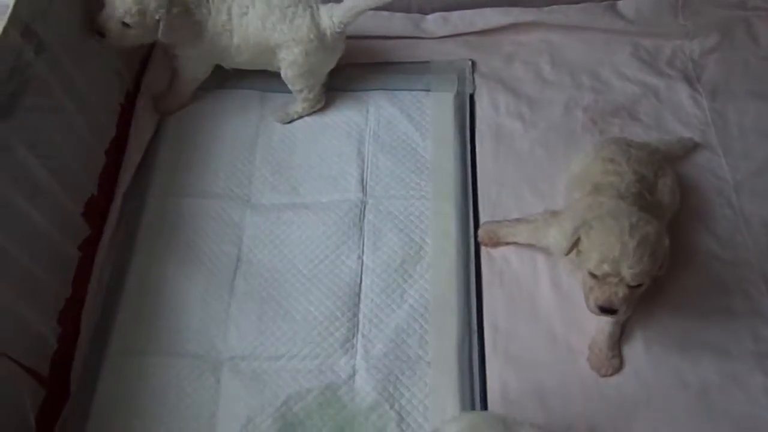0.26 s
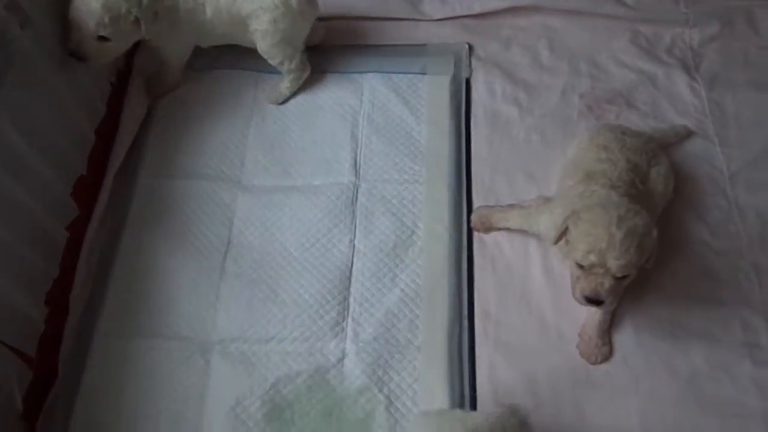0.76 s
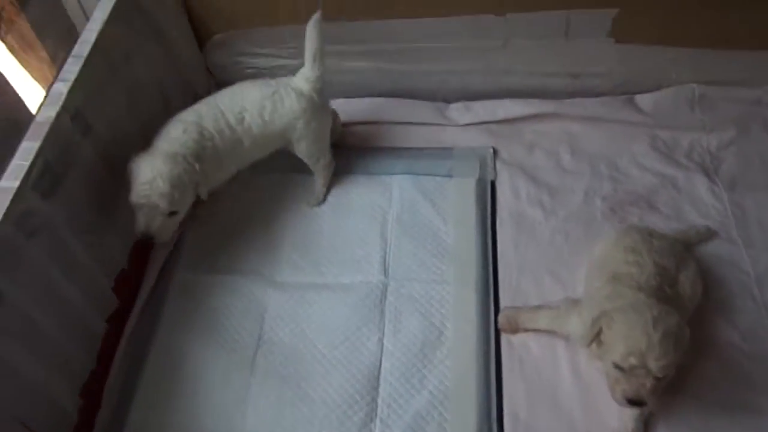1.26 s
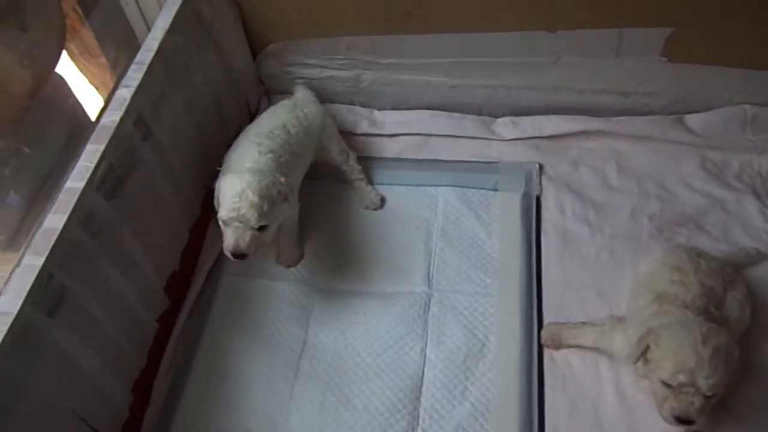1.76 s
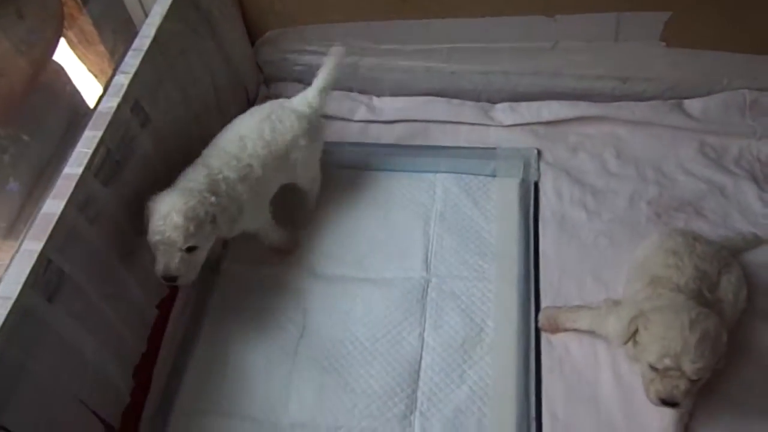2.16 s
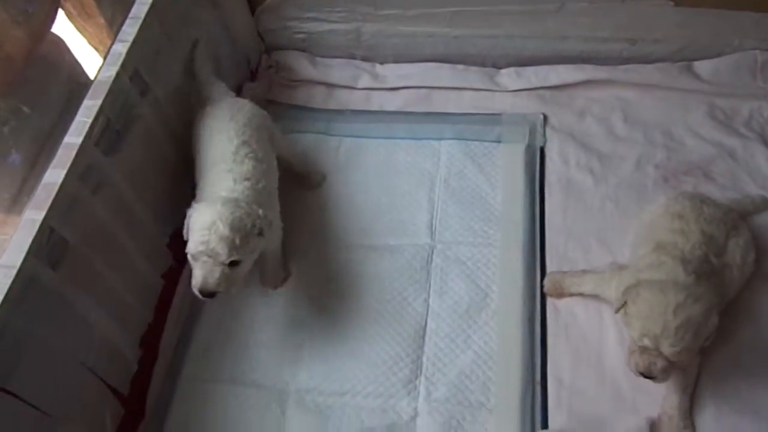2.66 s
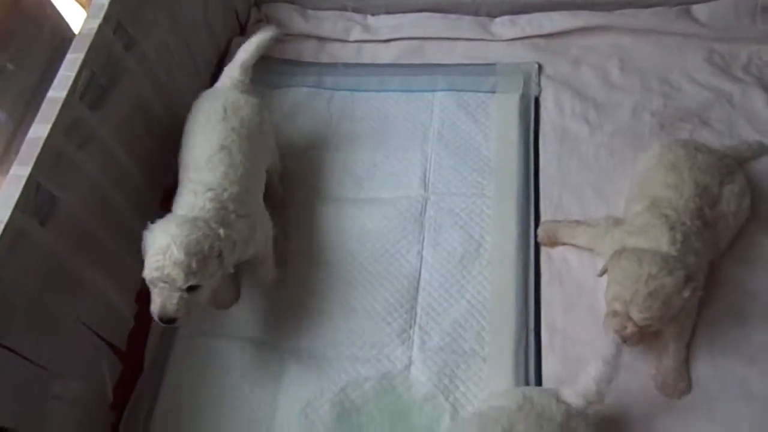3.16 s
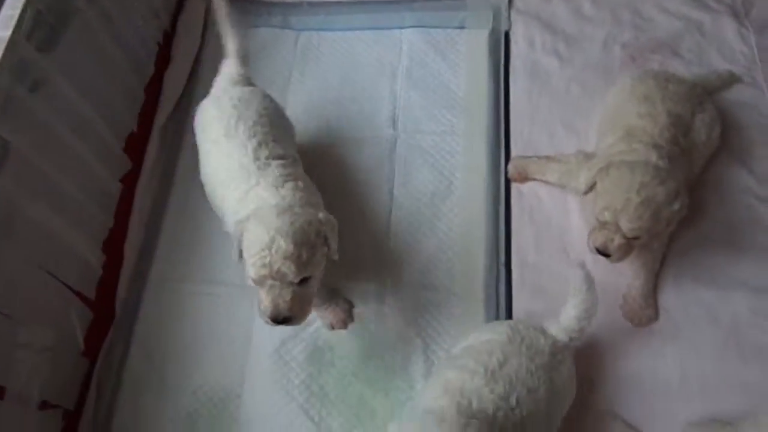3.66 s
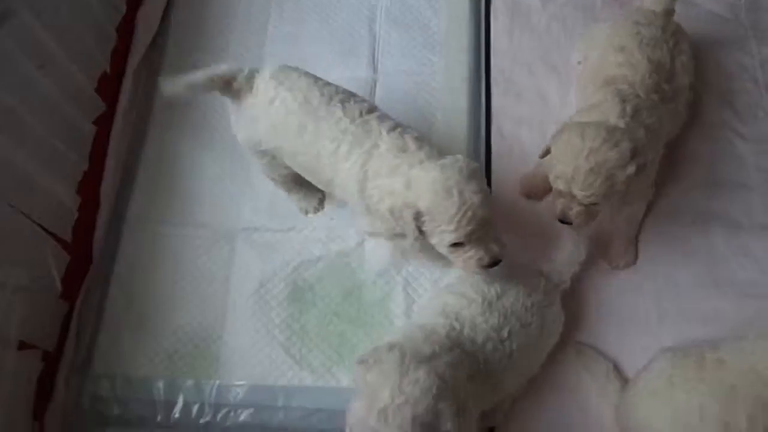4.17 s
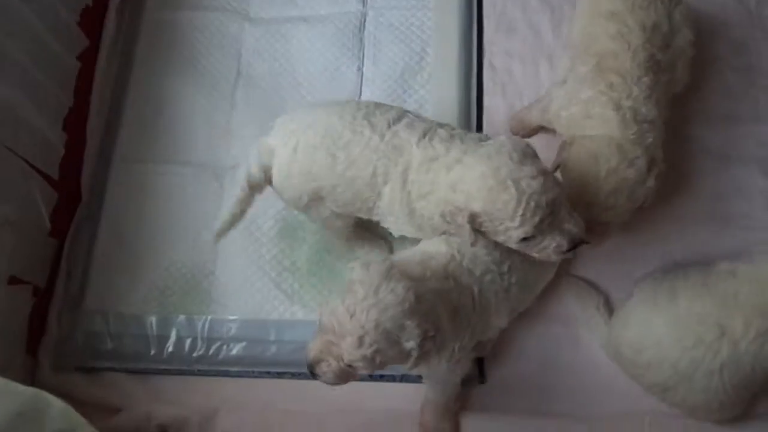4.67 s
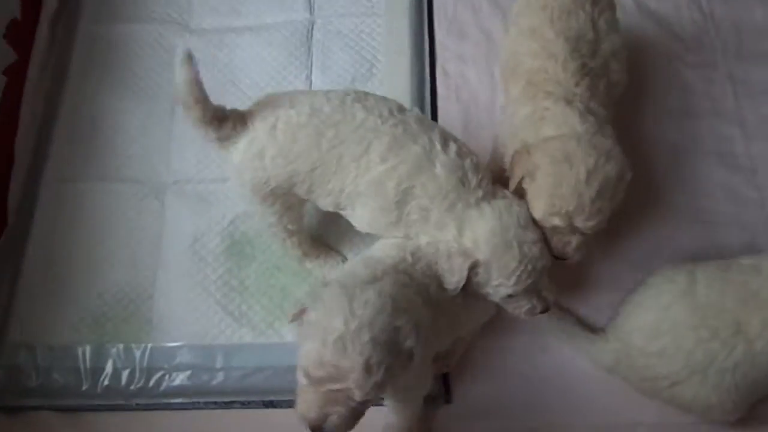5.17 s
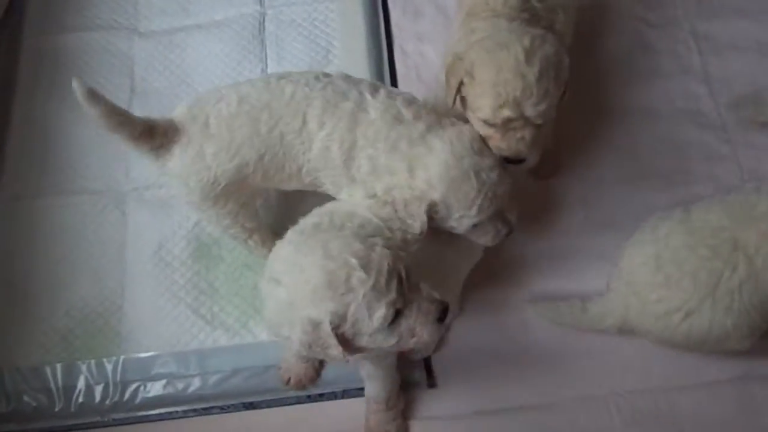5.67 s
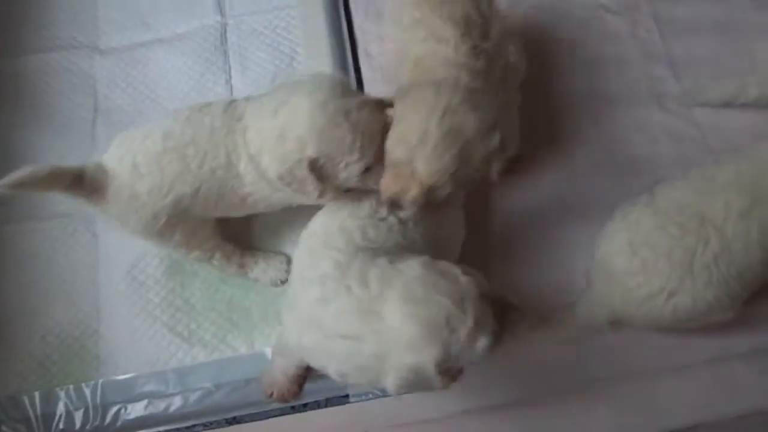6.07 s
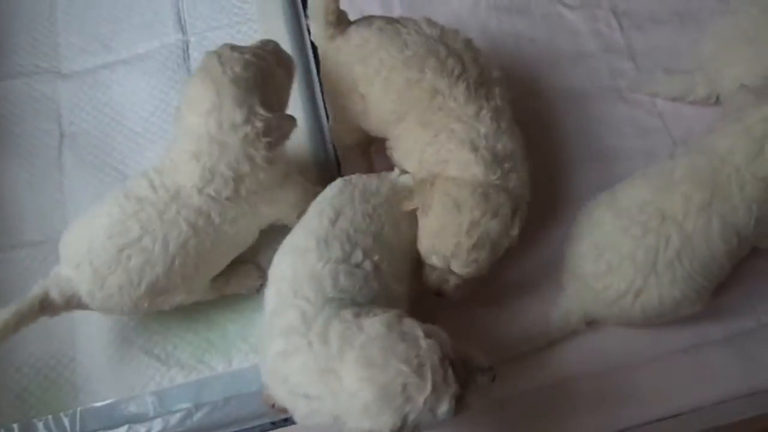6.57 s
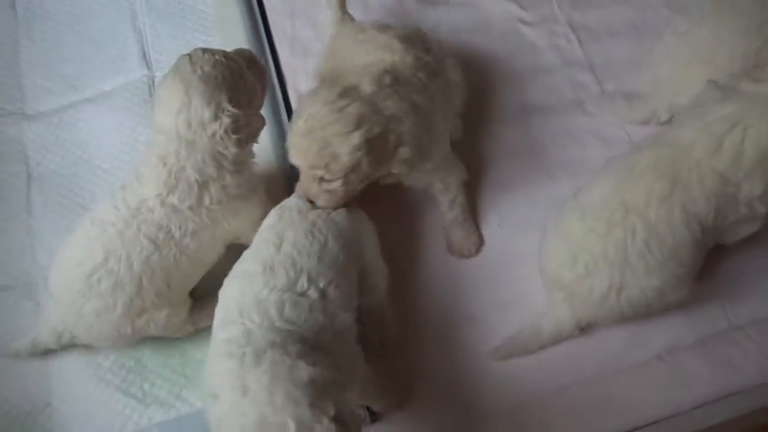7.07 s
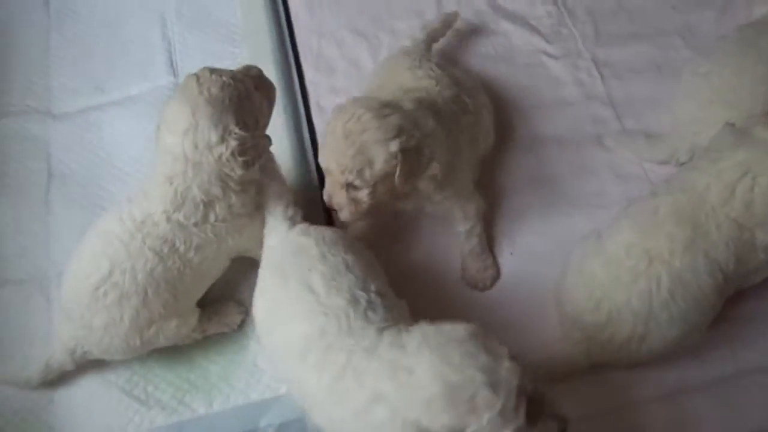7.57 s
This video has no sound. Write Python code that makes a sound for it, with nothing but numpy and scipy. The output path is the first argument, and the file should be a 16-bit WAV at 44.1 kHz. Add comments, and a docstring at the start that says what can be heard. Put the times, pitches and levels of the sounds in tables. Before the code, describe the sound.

Young puppies move about a padded box in a small room, heard close and almost centred. Faint low grunts come at 0 and 0.25 s, then at 0.85 s a very loud, harsh yelp arches up and breaks into rasp, ringing briefly. Rough little grunts with paw scuffs and claw ticks follow from 1.1 to 1.9 s, then near quiet, with a faint grunt at 2.8. A small yip at 3.05 s precedes two loud, raspy yelps at 3.3 and 3.5, a low falling whine at 3.75 and a longer one rising and sinking at 4.1. Soft grunts run from 4.6 to 5.8, with a quiet whine at 5.4. A thin wavering squeak comes at 6.1, then light ticks and a soft scuff. A faint yip at 7.3, a grunt at 7.4 and a loud, clear yip at 7.6 finish over steady faint rustle and room tone.

```python
"""Young puppies play in a whelping box in a small room, close to the microphone. Closed-mouth grunts come
first and recur throughout; a harsh yelp follows at 0.8 s, then a yip, two more yelps and falling whines
from 3 to 4.5 s, a last whine, a wavering squeak at 6.1 s and two yips near the end. Each cry is a sum of
harmonics mixed with rasping noise. Bursts of noise make paws tick and scuff over a steady rustle of
bedding and room tone; the room rings after each sound and a limiter holds down the loudest cries."""
import sys
import numpy as np
from scipy import signal
from scipy.fft import rfft, irfft, next_fast_len
from scipy.io import wavfile
from scipy.ndimage import uniform_filter1d, minimum_filter1d, map_coordinates

SR = 44100
rng = np.random.default_rng(int(sys.argv[2]) if len(sys.argv) > 2 else 0)


def to_wav(sig):
    """Store sig (one row per channel, or 1-D mono) as 16-bit WAV at the path in sys.argv[1].

    Samples outside -1..1 are clipped; the rate is SR.
    """
    pcm = np.clip(np.atleast_2d(sig), -1, 1) * 32767
    pcm = np.round(pcm).astype(np.int16)
    wavfile.write(sys.argv[1], SR, pcm.T)  # frames by channels


N = 344421
TOP_HZ = 15150  # upper band limit of the voices and the microphone
CRY_SAMPLES = SR // 2  # longest cry

# Levels and roughness of all cries are those before the voice dips; throat and rasp colours are relative.
# Harsh yelps, one pitch arch each: (time [s], rise [s], fall [s], tail [s], start [Hz], top [Hz], end [Hz],
# arch roundness [exponent], top level [dB], loss under the top [dB/octave], roughness [0-1])
YELPS = [(.848, 0.038, 0.058, 0.0078, 1010, 1770, 960, 2.8, -1, 18, .1),
         (3.285, 0.043, 0.055, 0.0045, 1088, 1627, 1036, 4, 1, 46.5, 0.2),
         (3.529, .049, .126, .055, 1108, 1657, 938, 1.8, -1.5, 27, 0.05)]
# Throat and mouth colour, a list for each yelp: (frequency [Hz], gain [dB])
YELP_THROATS = [
    [(500, -38.5), (900, -12), (1700, 3.5), (2400, -14), (2900, -8), (3550, -8.5), (4050, -8.5),
     (4650, -16.5), (5400, -23.5), (6400, 0), (7300, -38.5), (8700, -24), (10500, -32), (15000, -53)],
    [(500, -35), (1000, -21), (1600, 0), (2300, -17), (2950, -3), (3200, -22.5), (3500, -15.5),
     (4100, -15.5), (4650, -24.5), (5600, -21.5), (6500, -13), (8000, -21), (10000, -45), (15000, -49)],
    [(450, -26), (900, 14), (1200, -12), (1520, 4), (1950, -20.5), (2430, -7.5), (2800, -18), (3020, -12),
     (3300, -29.5), (3650, -15.5), (4000, -37), (4430, -10), (5400, -31.5), (7300, -25), (11000, -45)],
]
# Colour of the rasp, a list for each yelp: (frequency [Hz], density [dB per Hz])
YELP_RASPS = [
    [(350, -45.5), (600, -36), (1180, -29), (1740, -8.5), (2190, -25.5), (2370, -21), (3140, -25.5),
     (3600, -23.5), (3900, -24.5), (4600, -20), (5500, -26.5), (5920, -27), (6420, -17), (7150, -30.5),
     (8520, -31.5), (9620, -43), (15000, -51.5)],
    [(350, -48), (600, -40.5), (1160, -23.5), (1630, -1.5), (1790, -5), (2040, -7.5), (2220, -13),
     (2940, -11), (3190, -31.5), (3460, -11), (4060, -30), (4460, -17), (6870, -24), (9240, -39.5),
     (15000, -51.5)],
    [(350, -63.5), (600, -34), (1070, -30), (1180, -13.5), (1310, -17.5), (1500, -10), (1690, -13),
     (1920, 0), (2340, -13.5), (3060, -30), (3850, -27), (4340, -14.5), (5040, -40), (7060, -28),
     (15000, -54)],
]


def yelps():
    """Forced, open-mouthed cries, the closest and loudest source, that break into a rasp."""
    out = np.zeros(N)
    for yelp, throat, rasp in zip(YELPS, YELP_THROATS, YELP_RASPS):
        rows = arch(*yelp, attack_s=0.0076, release_s=0.0037)
        voice = cry(rows, throat, rasp, jitter=.045, waver=.025, flutter_db=0.5,
                    blur=0.6, slack_db=7.5, knee_hz=1988)
        add(out, rows[0][0], voice)
    return out


# Clear yips, one pitch arch each: (time [s], rise [s], fall [s], tail [s], start [Hz], top [Hz], end [Hz],
# arch roundness [exponent], top level [dB], loss under the top [dB/octave], roughness [0-1])
YIPS = [(3.048, .024, .025, .005, 1033, 1180, 897, 1.6, -22, 23.5, 0.01),
        (7.328, 0.024, .03, 0.0029, 1142, 1203, 890, 1.7, -25.5, 12.5, .06),
        (7.616, .044, 0.03, .135, 1146, 1393, 1103, 1.4, -6.5, 27.5, 0)]
# Throat and mouth colour, a list for each yip: (frequency [Hz], gain [dB])
YIP_THROATS = [
    [(900, -6), (1200, -8), (2300, 1), (3400, -10.5), (4650, -8.5), (5800, -8.5), (6900, -11.5),
     (8000, -45.5), (10000, -34.5), (12000, -34), (15000, -54.5)],
    [(900, -3.5), (1200, -1.5), (2300, 2), (3400, -9), (4600, -4), (5800, -2), (6900, -10), (8000, -45),
     (10000, -23), (11500, -25), (15000, -49)],
    [(950, 4.5), (1350, -16), (2020, 14), (2330, -6.5), (2750, -1.5), (3100, -18.5), (3550, 2),
     (4150, -0.5), (4600, -14.5), (5500, -7.5), (6900, -2), (7600, -15), (8400, -19), (15000, -49)],
]
# Path of a thin, soft squeak that wavers: (time [s], pitch [Hz], level [dB])
SQUEAK = [(6.122, 937, -56), (6.138, 1103, -38), (6.15, 1148, -39), (6.158, 1010, -33.5),
          (6.194, 978.5, -31), (6.206, 1108, -36.5), (6.22, 1017, -35.5), (6.224, 1016, -35.5),
          (6.262, 737, -46.5)]
# Throat and mouth colour of the squeak: (frequency [Hz], gain [dB])
SQUEAK_THROAT = [(700, 2), (1050, -5), (2050, -3.5), (2900, -57.5), (5000, -49), (6600, -25), (8000, -36),
                 (10000, -32), (12800, -40), (15000, -43)]
# Colour of the rasp in yips and squeak: (frequency [Hz], density [dB per Hz])
YIP_RASP = [(500, -27), (1100, -10.5), (2400, 5.5), (3300, -8), (4500, -5), (6500, -11.5), (8500, -16),
            (15000, -29)]
SQUEAK_ROUGH = 0.0057  # roughness [0-1]


def yips():
    """High, clean arches of pitch, and one soft squeak that follows its own path."""
    out = np.zeros(N)
    cries = [arch(*yip, attack_s=0.002, release_s=0.0027) for yip in YIPS]
    cries.append([(*point, SQUEAK_ROUGH) for point in SQUEAK])
    for rows, throat in zip(cries, YIP_THROATS + [SQUEAK_THROAT]):
        voice = cry(rows, throat, YIP_RASP, jitter=0.068, waver=0.019, flutter_db=5.5,
                    blur=0.32, slack_db=21.5, knee_hz=2460)
        add(out, rows[0][0], voice)
    return out


# Low whines, one pitch arch each: (time [s], rise [s], fall [s], tail [s], start [Hz], top [Hz], end [Hz],
# arch roundness [exponent], top level [dB], loss under the top [dB/octave], roughness [0-1])
WHINES = [(3.75, 0.0275, 0.093, 0.02, 428, 425.9, 290, 2, -27, 29, 0.01),
          (5.423, 0.063, 0.056, 0.0302, 336.5, 469.3, 301.2, 1.4, -32, 9.5, 0.06)]
# The longest whine climbs and sinks in steps: (time [s], pitch [Hz], level [dB])
LONG_WHINE = [(4.094, 270.8, -47), (4.116, 320.5, -40.5), (4.128, 389.8, -31), (4.154, 447, -30.5),
              (4.17, 568, -30.5), (4.212, 488.6, -25.5), (4.226, 422.4, -28.5), (4.252, 390, -28),
              (4.272, 327, -39), (4.298, 309.6, -32.5), (4.355, 245, -45.5)]
# Throat and mouth colour, a list for each whine in order of time: (frequency [Hz], gain [dB])
WHINE_THROATS = [
    [(280, 20), (440, -7), (850, 1.5), (1250, -8.5), (1800, -35), (2600, -59), (4400, -38), (10000, -41)],
    [(280, 5.5), (480, -3.5), (850, -2), (1100, -8), (1550, -13.5), (2050, -11), (2500, -0.5), (2900, -27),
     (3400, -19), (3900, -43), (4400, -16), (5400, -45), (6800, -29), (14000, -69)],
    [(280, 3), (460, 1), (650, -18), (900, -8.5), (1350, -16), (1800, -5), (2300, -21), (2700, -15),
     (3500, -31), (5500, -20), (8000, -46), (14000, -38)],
]
# Colour of the rasp in the whines: (frequency [Hz], density [dB per Hz])
WHINE_RASP = [(200, -17), (450, -7), (900, 8.5), (1400, -2.5), (2000, 2.5), (2500, -4), (3000, -3.5),
              (3800, -10), (4500, -10), (5400, -17), (7000, -17.5), (14000, -29)]
LONG_WHINE_ROUGH = 0.032  # roughness [0-1]


def whines():
    """The low register: whines that darken as they sink."""
    out = np.zeros(N)
    cries = [arch(*whine, attack_s=.014, release_s=0.0141, catch=0) for whine in WHINES]
    cries.append([(*point, LONG_WHINE_ROUGH) for point in LONG_WHINE])
    cries.sort(key=lambda rows: rows[0][0])
    for rows, throat in zip(cries, WHINE_THROATS):
        voice = cry(rows, throat, WHINE_RASP, jitter=.045, waver=0.025, flutter_db=5,
                    blur=0.17, slack_db=16, knee_hz=1000, count=26)
        add(out, rows[0][0], voice)
    return out


# Closed-mouth grunts: (time [s], length before the release [s], top pitch [Hz], end pitch [Hz],
# level [dB], roughness [0-1])
GRUNTS = [(.002, 0.03, 335.5, 301, -42, .02), (.247, 0.022, 327.7, 255, -52.5, .15),
          (1.108, 0.045, 265.6, 270, -45, 0.5), (1.584, 0.023, 348.2, 266, -44, 0.64),
          (1.871, 0.012, 380, 294, -42, 0.46), (2.765, 0.037, 301, 269, -57.5, 0),
          (4.599, 0.071, 333.9, 298.6, -41.5, 0.07), (4.902, 0.0528, 319.9, 262, -41, 0.11),
          (5.142, 0.078, 270.3, 250, -43.5, 0.01), (5.64, 0.02, 284.4, 265, -44.5, 0),
          (5.778, 0.036, 270, 241, -50, 0), (7.397, 0.08, 331.7, 252.5, -38, .1)]
# Throat colour behind the closed mouth: (frequency [Hz], gain [dB])
GRUNT_THROAT = [(260, 15.5), (340, 13.5), (600, 2.5), (950, 3), (1350, -21), (1800, -4.5), (2600, -46),
                (5000, -50), (12000, -50)]
# Colour of the rasp in the grunts: (frequency [Hz], density [dB per Hz])
GRUNT_RASP = [(180, -39), (350, 13.5), (700, -5.5), (1800, -1), (2700, -1.5), (3600, -13), (4700, -11),
              (7000, -14.5), (14000, -23)]
GRUNT_RISE = .3  # share of the length spent swelling
GRUNT_START, GRUNT_SWELL_DB = 0.99, 12  # start pitch over top pitch, loss under the top [dB/octave]
GRUNT_RELEASE_S = 0.036  # extra time for dying away


def grunts():
    """Small arches behind a closed mouth: they swell, sag in pitch and die away."""
    out = np.zeros(N)
    for s, length, hz, end_hz, db, rough in GRUNTS:
        rise_s = GRUNT_RISE * length
        rows = arch(s, rise_s, (1 - GRUNT_RISE) * length, GRUNT_RELEASE_S, GRUNT_START * hz, hz, end_hz,
                    2, db, GRUNT_SWELL_DB, rough,
                    attack_s=rise_s, release_s=GRUNT_RELEASE_S + rise_s, catch=0)
        voice = cry(rows, GRUNT_THROAT, GRUNT_RASP, jitter=.05, waver=.04, flutter_db=1.2,
                    blur=.2, slack_db=0, knee_hz=950, count=20)
        add(out, s, voice)
    return out


# The folds beat unevenly and sound quarters of the pitch: (time [s], share [0-1])
UNEVEN_BEATS = [(3.56, 0.04), (3.572, 0.88), (3.6, 1), (3.63, 0)]
RISING_SLACK = .6  # pressed folds stay brighter on the way up than on the way down


def cry(rows, throat, rasp, jitter, waver, flutter_db, blur, slack_db, knee_hz, count=14):
    """Vocal folds sweep their harmonics through the throat; roughness shakes them and turns tone to rasp."""
    t = rows[0][0] + np.arange(CRY_SAMPLES) / SR
    hz, db, rough = curves(rows, t)
    db, rough = dipped(t, db, rough)
    live = t < rows[-1][0]
    t_live, rough_live = t[live], rough[live]

    rising = t_live < t[hz.argmax()]
    octaves_under_top = np.log2(hz.max() / hz[live])
    slack = octaves_under_top * np.where(rising, RISING_SLACK, 1)
    shake = jitter * wobble(600, CRY_SAMPLES) + waver * wobble(120, CRY_SAMPLES)
    hz = hz * (1 + np.sqrt(rough) * shake)
    phase = 2 * np.pi * np.cumsum(hz) / SR

    # whole multiples of the pitch, and quarter steps between them where the folds beat unevenly
    split = np.interp(t_live, *np.transpose(UNEVEN_BEATS), left=0, right=0)
    if split.any():
        k = np.arange(3, 33)[:, None] / 4
    else:
        k = np.arange(1, count + 1)[:, None]
    partial_hz = k * hz[live]
    # slack folds close softly: partials above the knee fade as the pitch sinks
    dull_db = slack_db * slack * np.log2(np.maximum(partial_hz / knee_hz, 1))
    gains = amp(along(throat, partial_hz) - dull_db)
    gains = gains * np.where(k % 1, split, 1) * (partial_hz < TOP_HZ)

    # the higher a partial, the less steady its phase
    knots_s = np.arange(200) / 350
    stray = np.array([np.interp(t_live - t[0], knots_s, rng.standard_normal(200)) for _ in k])
    partials = gains * np.sin(k * phase[live] + blur * np.log(k) * stray)
    tone = np.sum(partials, axis=0) / np.sqrt(np.sum(gains ** 2, axis=0) / 2)
    puffs = noise(rasp, CRY_SAMPLES, gate=1 + np.cos(phase))[live]  # air escapes in one puff a cycle
    level = amp(db + flutter_db * np.sqrt(rough) * wobble(250, CRY_SAMPLES))[live]
    return level * (np.sqrt(1 - rough_live) * tone + np.sqrt(rough_live) * puffs)


SAG_OCTAVES_PER_S, FADE_DB_PER_S = 1.5, 112.5  # the tail of a cry sinks and fades
CATCH_ROUGH, CATCH_S = 0.35, 0.0027  # the folds start roughly before they settle


def arch(s, rise_s, fall_s, tail_s, start_hz, top_hz, end_hz, roundness, db, swell_db, rough,
         attack_s, release_s, catch=CATCH_ROUGH):
    """One push of the voice, loudness following pitch: rows of (time [s], pitch [Hz], dB, roughness)."""
    length = rise_s + fall_s + tail_s
    t = np.linspace(0, length, 400)
    before = np.clip(1 - t / rise_s, 0, 1)
    after = np.clip((t - rise_s) / fall_s, 0, 1)
    trail = np.maximum(t - rise_s - fall_s, 0)
    hz = top_hz - (top_hz - start_hz) * before ** roundness - (top_hz - end_hz) * after ** roundness
    gate = np.clip(np.minimum(t / attack_s, (length - t) / release_s), .01, 1)
    level = db - swell_db * np.log2(top_hz / hz) - FADE_DB_PER_S * trail + 20 * np.log10(gate)
    sagging_hz = hz * 2 ** (-SAG_OCTAVES_PER_S * trail)
    return np.column_stack([s + t, sagging_hz, level, rough + catch * np.exp(-t / CATCH_S)])


# Moments when the voice weakens, most of them also turning raspy:
# (middle [s], half length [s], added roughness [0-1], loss [dB])
VOICE_DIPS = [(0.862, 0.012, .15, 12), (0.899, .005, 0.8, 18.5), (0.929, .013, 0.8, 15.5),
              (3.307, 0.0098, 0.5, 10.5), (3.348, .022, .65, 13.5), (3.609, .016, .65, 8.5),
              (3.671, 0.024, 0, 22), (4.179, .012, 0.1, 0.5), (5.458, .009, 0.18, 5.5),
              (7.721, .024, .14, 4)]


def dipped(t, db, rough):
    """Each dip weakens the voice for a moment and may roughen it."""
    for s, half_s, rasp, loss_db in VOICE_DIPS:
        depth = np.exp(-((t - s) / half_s) ** 2)
        db = db - loss_db * depth
        rough = rough + rasp * depth
    return db, np.clip(rough, 0, 1)


# Claws and crinkles on the pad: (time [s], level before a common 6.5 dB cut [dB], pitch [Hz])
TICKS = [(1.1137, -32, 2440), (1.3008, -40, 2080), (1.3412, -39, 3220), (1.6473, -35, 2360),
         (1.6836, -33.5, 2940), (1.8463, -38, 3120), (2.6, -32.5, 2170), (3.9569, -36.5, 2970),
         (4.4614, -32.5, 2600), (4.7192, -36.5, 2890), (5.8506, -32.5, 2520), (5.9339, -41, 6840),
         (6.1946, -32.5, 3300), (6.6828, -37.5, 2620), (6.7441, -36.5, 3095), (6.9935, -33.5, 1860),
         (7.2817, -41, 2850)]
# Paws and fur rubbing the bedding: (time [s], length [s], level at mid-stroke [dB], pitch [Hz])
SCUFFS = [(.255, .04, -58, 4900), (1.111, .08, -43, 2370), (1.59, .08, -48.5, 3550),
          (1.861, .05, -45.5, 2700), (2.377, .1, -56, 2500), (4.627, 0.0994, -55.5, 2540),
          (6.814, .15, -54, 1200)]
# Colour of the bedding's steady rustle: (frequency [Hz], relative density [dB per Hz])
BEDDING = [(150, 1), (700, 7.5), (2000, 5.5), (5000, -5.5), (10000, -16.5), (15000, -6.5)]


def paws():
    """Claws tick as decaying noise bursts; fur and feet rub the bedding as swelling strokes of noise."""
    out, t = np.zeros(N), np.arange(SR // 4) / SR
    fade = amp(-60 * t / .02)  # 60 dB down in 20 ms
    for s, db, hz in TICKS:
        snap = noise([(300, -14), (hz / 2, -6), (hz, 0), (hz * 2, -10)], len(t))
        add(out, s, amp(db - 6.5) * fade * snap)
    for s, length, db, hz in SCUFFS:
        stroke = np.sin(np.pi * np.minimum(t / length, 1))
        rub = noise([(400, -7), (hz / 2, -6), (hz, 0), (hz * 2, -8), (15000, -17)], len(t))
        add(out, s, amp(db) * stroke * rub)
    # the bedding is never quite still
    stir_db = 2.5 * wobble(4, N)
    rustle_level = amp(-61.5 + 0.87 * wobble(51, N) + stir_db)
    return out + rustle_level * noise(BEDDING, next_fast_len(N))[:N]


# Ringing time of the small room: (frequency [Hz], time to fall 60 dB [s])
ROOM_T60 = [(180, 0.41), (265, 0.93), (400, 1), (900, 0.81), (1400, 0.31), (2000, 0.38), (3000, 0.19),
            (4100, 0.26), (4600, 0.32), (6800, .28), (12000, 0.68)]
# Colour of the echo from the walls: (frequency [Hz], relative gain [dB])
WALLS = [(200, -4), (265, 2), (400, -14.5), (1000, -7), (1450, 4), (1750, 3.5), (2050, -0.5), (2750, 2.5),
         (4100, -1.5), (4700, -1), (5600, 1.5), (6900, -2), (8200, -0.5), (9500, -7.5), (14000, -12.5)]


def room(x):
    """The box walls answer at once, then the room dies away, each band at its own rate."""
    hz, t, z = signal.stft(rng.standard_normal(SR * 3 // 4), SR, nperseg=256)
    decay_db = along(WALLS, hz)[:, None] - 60 * t / along(ROOM_T60, hz)[:, None]
    tail = signal.istft(z * amp(decay_db), SR, nperseg=256)[1]
    age = np.arange(len(tail)) / SR
    tail = tail * (1 - np.exp(-age / 0.0033)) * (1 + np.exp(-age / 0.017))  # near walls thicken the start
    box = np.zeros(len(tail))
    bounces = (rng.uniform(.002, .014, size=8) * SR).astype(int)
    box[bounces] = rng.choice([-1, 1], size=8)
    echo = amp(-13.5) * tail / np.linalg.norm(tail) + amp(-20.0) * box
    return signal.fftconvolve(x, echo)[:N]


# Colour of the room tone: (frequency [Hz], relative density [dB per Hz])
AIR = [(15, -44.5), (25, -11), (64, -16), (81, -2), (109, -5.5), (231, -13.5), (271, -2.5), (415, -5),
       (450, -3.5), (604, -6), (691, -2.5), (978, -9), (1210, -9.5), (2700, -16), (15000, -22)]


def room_tone(db):
    """Steady coloured noise, the quiet air behind everything, at an rms level in dB."""
    return amp(db) * noise(AIR, next_fast_len(N))[:N]


def amp(db):
    """Decibels to gain."""
    return 10 ** (np.asarray(db) / 20)


def unit(x):
    """Scale to rms 1."""
    return x / np.sqrt(np.mean(x ** 2) + 1e-20)


def along(points, hz):
    """Read (frequency [Hz], value) points on a log axis."""
    f, v = np.transpose(points)
    return np.interp(np.log(hz + 1), np.log(f + 1), v)


def curves(rows, t):
    """Each column after the time, read at times t."""
    s, *cols = np.transpose(rows)
    return [np.interp(t, s, c) for c in cols]


def wobble(rate, size):
    """A smooth random curve with rate knots a second."""
    knots = rng.standard_normal(size // 8)
    return map_coordinates(knots, [np.arange(size) * rate / SR], mode="mirror")


def noise(spectrum, size, gate=1):
    """Noise of rms 1, gated at its source and then coloured."""
    hz = np.fft.rfftfreq(size, 1 / SR)
    low_cut = 1 / (1 + (spectrum[0][0] / 2 / (hz + 1)) ** 4)  # from half the lowest listed frequency
    bins = rfft(gate * rng.standard_normal(size))
    return unit(irfft(bins * amp(along(spectrum, hz)) * low_cut, size))


def add(track, s, sound):
    """Mix a sound into the track from time s."""
    part = track[max(round(s * SR), 0):][:len(sound)]
    part += sound[:len(part)]


WIDTH_DB = -33.5  # gain of the echo that differs between the channels
AIR_DB, AIR_SIDE_DB = -55, -78.5  # room tone: common to both channels, and their difference


def scene():
    """Puppies and room tone reach both channels almost alike."""
    near = yelps() + yips() + whines() + grunts() + paws()
    mid = near + room(near) + room_tone(AIR_DB)
    side = amp(WIDTH_DB) * room(near) + room_tone(AIR_SIDE_DB)
    return np.array([mid + side, mid - side])


def record(dry):
    """A fast limiter holds the loudest cries near full scale; nothing passes above the band limit."""
    needed = np.minimum(1, 1.05 / (np.abs(dry).max(axis=0) + 1e-9))
    held = dry * uniform_filter1d(minimum_filter1d(needed, size=45), size=31)
    # only high positive crests are pushed down, so the wave moves off centre: a faint thump
    excess = uniform_filter1d(np.maximum(held - .8, 0), size=6)
    bent = held - 0.7 * excess
    size = next_fast_len(N + SR // 4)
    in_band = np.fft.rfftfreq(size, 1 / SR) < TOP_HZ
    return irfft(rfft(bent, size) * in_band, size)[:, :N]


dry = scene()
out = record(dry)
to_wav(out)
```